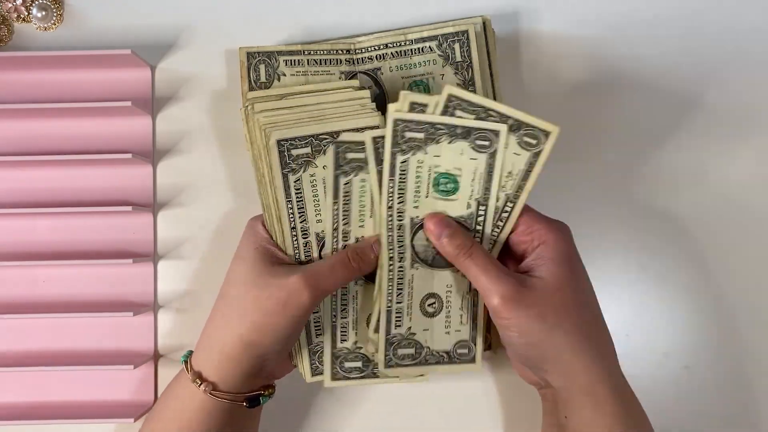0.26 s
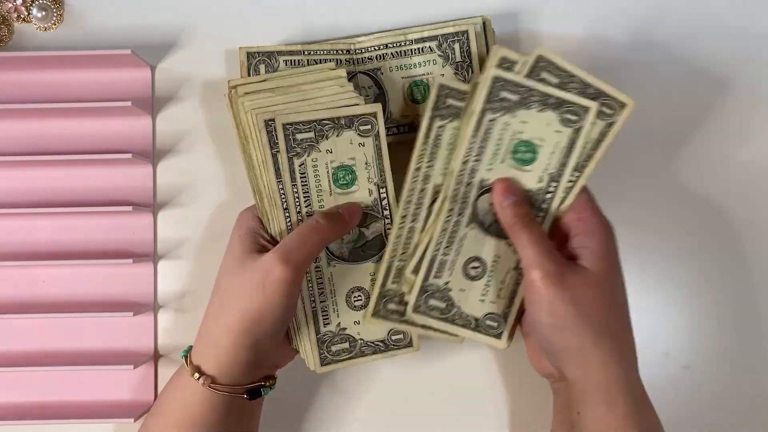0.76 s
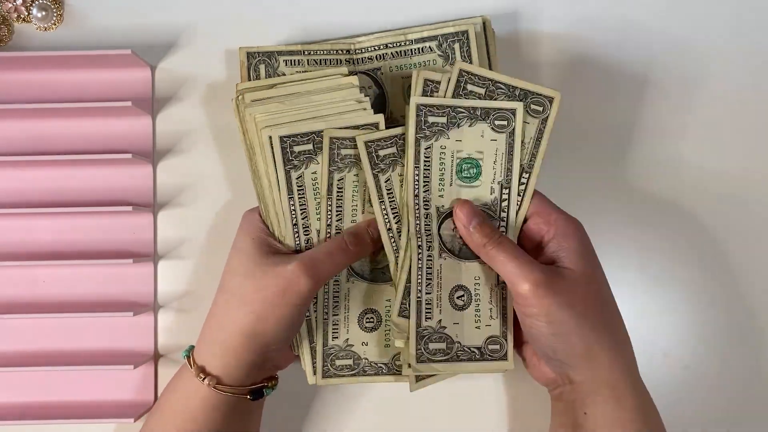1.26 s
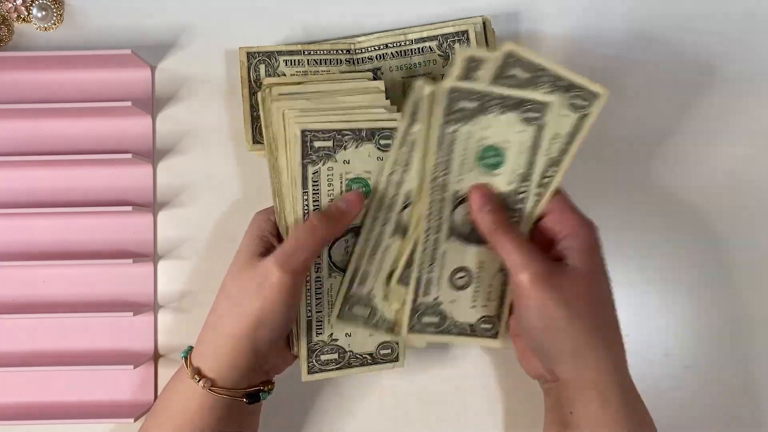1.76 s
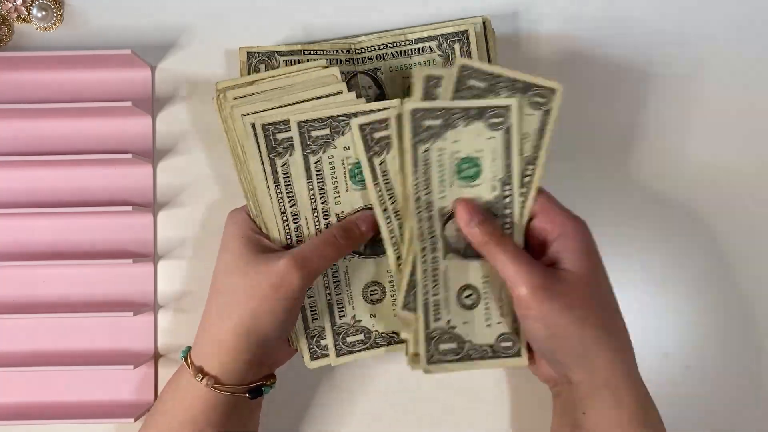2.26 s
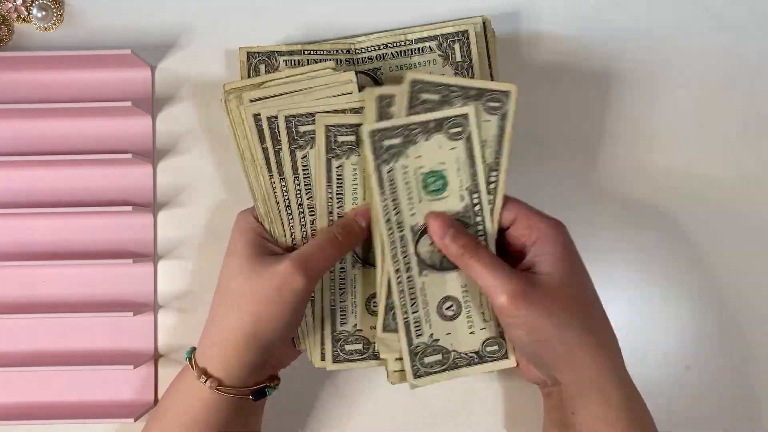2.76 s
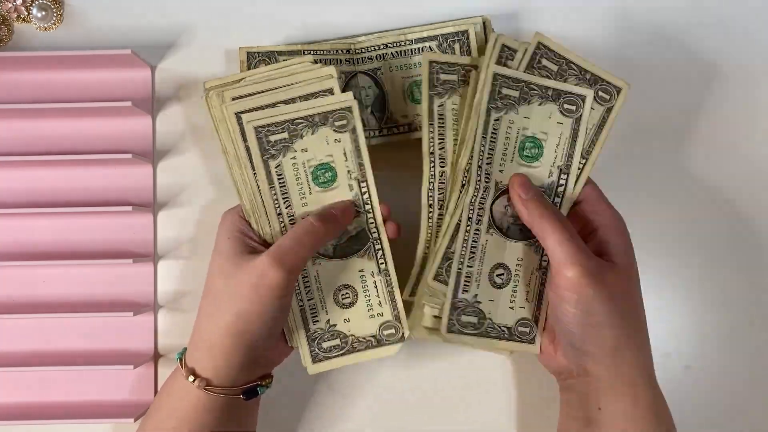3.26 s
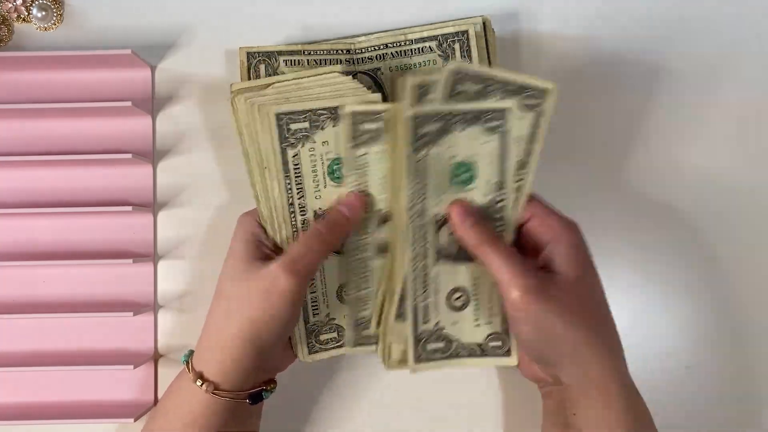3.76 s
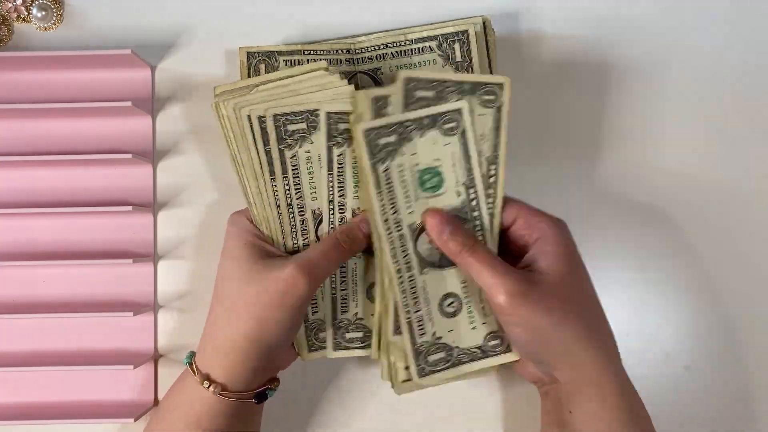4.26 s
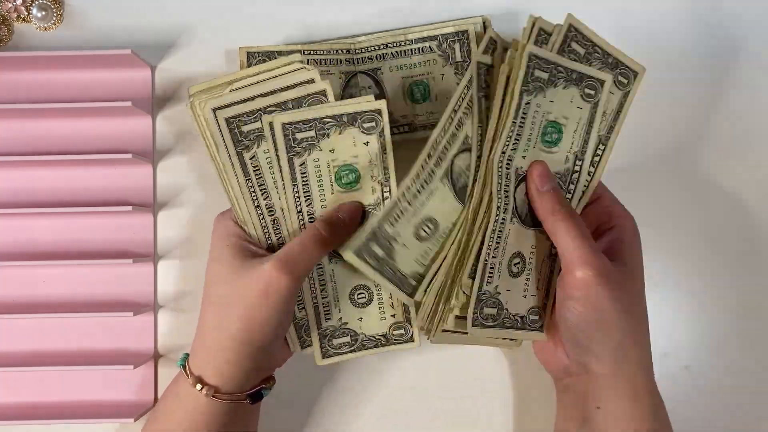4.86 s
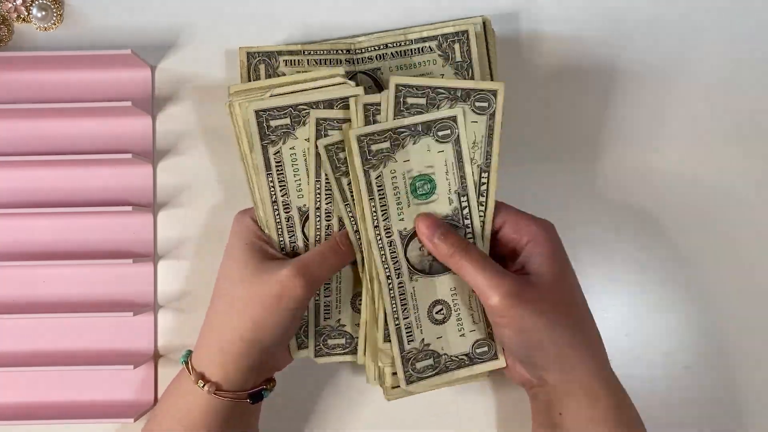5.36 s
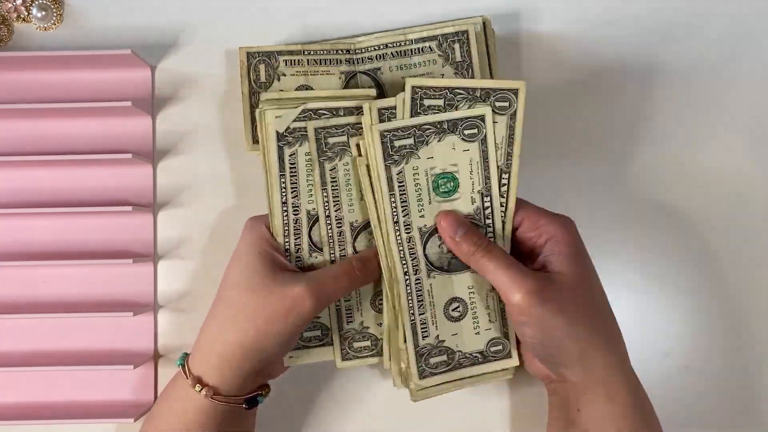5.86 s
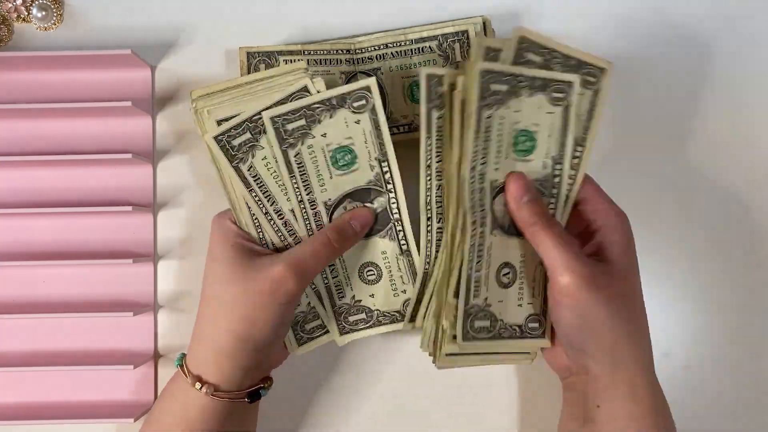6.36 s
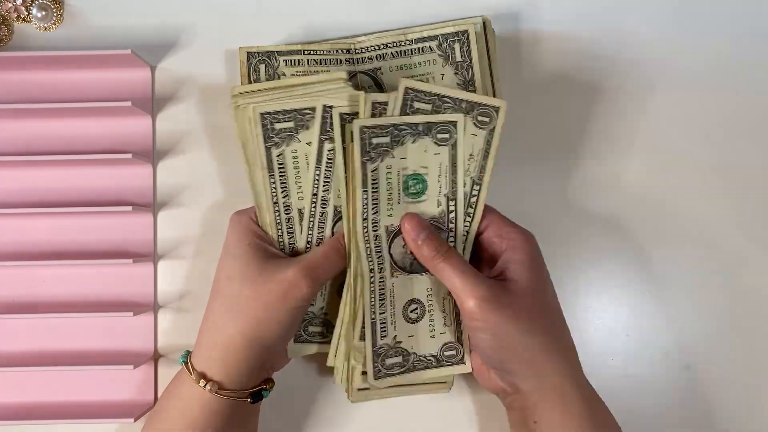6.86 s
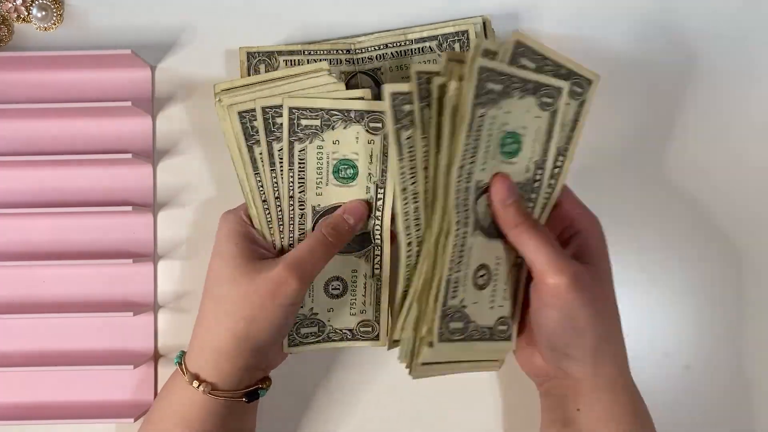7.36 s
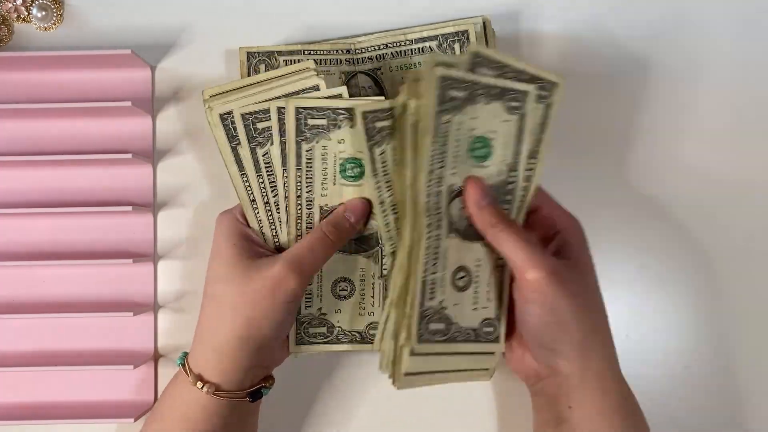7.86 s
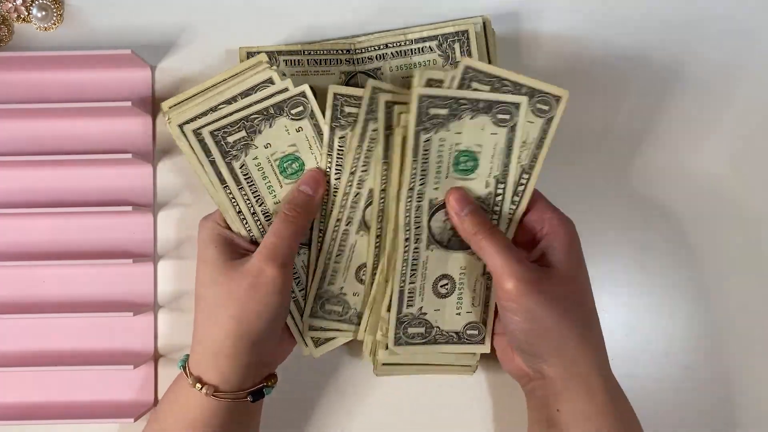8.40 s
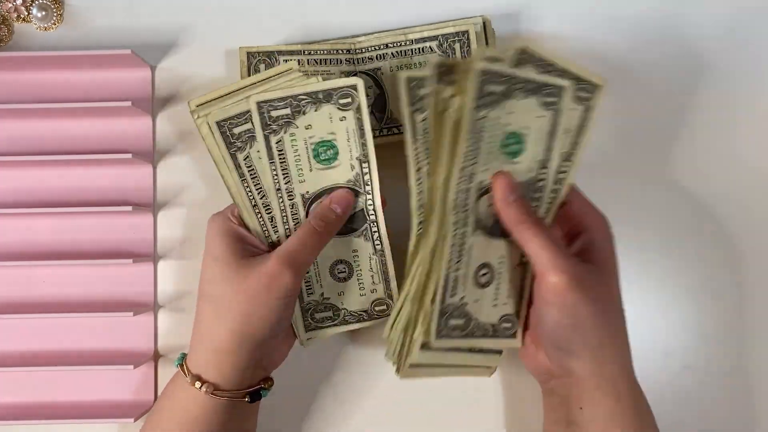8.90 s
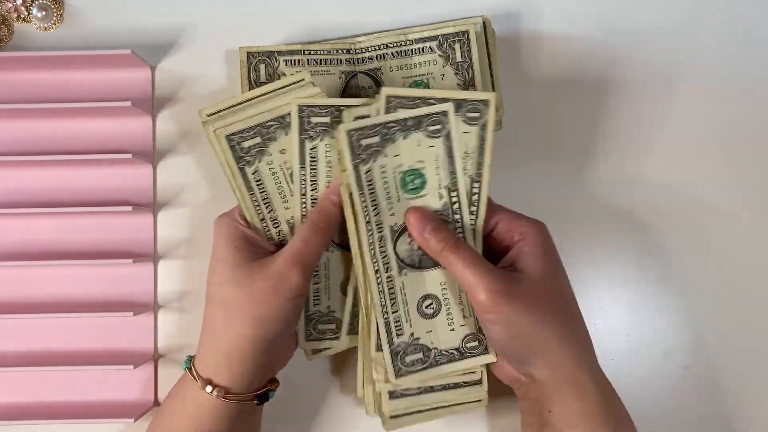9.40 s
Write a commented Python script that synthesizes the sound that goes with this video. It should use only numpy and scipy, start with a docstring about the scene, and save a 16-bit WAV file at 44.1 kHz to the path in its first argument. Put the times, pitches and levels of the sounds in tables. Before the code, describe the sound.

A stack of soft old bills is counted close up, each note sliding with a dry rustle and a small crisp snap in a quiet room.

```python
"""Worn paper banknotes rustle and pop as they are thumbed from one hand to the other above a desk.
Each note slides with a grainy rustle, made of flickering noise, and its creases pop, made of sharp pushes.
Both are coloured by three voices of the paper: the sheets boom in the pocket between the hands,
crack in the mids and hiss in the treble. Behind them a quiet room rumbles as steady noise,
and a low wavering hum, a gliding sine, comes now and then. A phone picks it all up in stereo."""
import sys
import numpy as np
from scipy import signal
from scipy.fft import rfft, irfft, next_fast_len
from scipy.io import wavfile
from scipy.ndimage import uniform_filter1d

SR = 44100
rng = np.random.default_rng(int(sys.argv[2]) if len(sys.argv) > 2 else 0)


def digitize_waveform(pressure):
    """Quantize a signal to 16-bit integers and store it at the path in sys.argv[1].

    Rows of a 2-D input are taken as channels; values are limited to [-1, 1].
    """
    field = np.atleast_2d(pressure).T
    bounded = np.clip(field, -1, 1)
    quanta = np.round(bounded * 32767).astype(np.int16)
    wavfile.write(sys.argv[1], SR, quanta)


N = 424947  # length [samples]

# colour of the air pocket between the hands: (frequency [Hz], relative level [dB])
BOOM = [(90, -39), (250, -13), (500, -11.5), (800, 0), (1100, 0), (1500, -12), (2100, -22), (5000, -51.5)]
# colour of the bent sheet: (frequency [Hz], relative level [dB])
CRACK = [(600, -59.5), (1450, -8), (1900, 3.5), (2800, -1), (3400, -5.5), (3800, -2.5), (4300, -4.5),
         (4700, -1.5), (5600, -8), (7000, -12), (14000, -60.5)]
BEND_LAG_MS = 1.588  # how late a bending wave at 1 kHz arrives; some voices use a share of it


def undb(db):
    """Turn decibels into an amplitude factor."""
    return 10 ** (np.asarray(db) / 20)


def on_log(hz, table):
    """Read a (frequency [Hz], value) table on a log-frequency axis."""
    table_hz, values = np.transpose(table)
    return np.interp(np.log(hz + 1), np.log(table_hz), values)


def response(table, lag_ms=0., size=4096):
    """Short ringing of unit energy with the table's colour; with a lag, low notes come later."""
    hz = np.fft.rfftfreq(size, 1 / SR)
    # folding the cepstrum forward makes the ringing start at once (minimum phase)
    cepstrum = irfft(np.log(undb(on_log(hz, table))))
    cepstrum[1:size // 2] *= 2
    cepstrum[size // 2 + 1:] = 0
    # bending waves run at a speed that grows with the root of frequency
    bend = np.exp(-4j * np.pi * lag_ms * np.sqrt(hz / 1000))
    ringing = irfft(np.exp(rfft(cepstrum)) * bend)
    return ringing / np.sqrt(np.sum(ringing ** 2))


def sound(push, ringing):
    """Let a push signal set off the ringing at every sample."""
    return signal.oaconvolve(push, ringing)[:N]


def walk(rate):
    """Random wander in straight ramps, with `rate` new targets per second; spread about 1.25."""
    hold = int(SR / rate)
    steps = np.repeat(rng.standard_normal(N // hold + 1), hold)
    return 1.53 * uniform_filter1d(steps, hold)[:N]


def room():
    """Steady noise rumble with a faint treble, almost alike in both channels, and a gliding sine hum."""
    # colour of the rumble: (frequency [Hz], relative level [dB])
    rumble_colour = [(15, -29), (25, -8), (54, 0.5), (80, 0), (136, -6), (236, -14.5), (330, -23.5),
                     (480, -27.5), (1200, -46), (2000, -45), (16000, -57.5)]
    # each hum is a list of points: (time [s], pitch [Hz], rms level [dB])
    hum_glides = [
        [(.1, 116.2, -62), (.23, 130, -52), (.4, 137.2, -62), (.55, 111.4, -58)],
        [(1.55, 116, -63), (1.67, 121.7, -56), (1.8, 119, -62)],
        [(3.95, 121.5, -62.5), (4.24, 114.5, -58.5), (4.32, 114, -58)],
    ]
    rumble_db = -57.5  # rms of the noise that both channels share
    t = np.arange(N) / SR
    ringing = response(rumble_colour, size=16384)
    same = sound(rng.standard_normal(N), ringing)
    other = sound(rng.standard_normal(N), ringing)
    rumble = undb(rumble_db) * np.array([same + undb(-14.0) * other, same])
    hum = 0
    for s, hz, db in map(np.transpose, hum_glides):
        gate = np.clip(np.minimum(t - s[0], s[-1] - t) / 0.0086, 0, 1)  # 8.6 ms fades
        turns = np.cumsum(np.interp(t, s, hz)) / SR
        sine = np.sqrt(2) * np.sin(2 * np.pi * turns)  # rms 1
        hum = hum + gate * undb(np.interp(t, s, db)) * sine
    return rumble + hum


def grit(flicker_db, grain_db, rate):
    """Stick-slip of paper fibres: flickering noise with lone larger slips, `rate` per second; rms 1."""
    sizes = undb(grain_db * np.minimum(rng.exponential(size=N), 2.5))
    slips = (rng.random(N) < rate / SR) * sizes
    x = rng.standard_normal(N) * (undb(flicker_db * walk(250)) + 8 * slips)
    return x / np.sqrt(np.mean(x ** 2))


def rubbing():
    """Strength over time of the hiss, crack and boom pushes, from shifting fingers and sliding notes."""
    # the fingers rest and their shifting sinks: (time of the deepest point [s], depth [dB], half length [s])
    pauses = [(1.206, 34, 0.065), (1.579, 16, 0.083), (2.526, 12, 0.032), (2.664, 7, .03),
              (2.827, 12, 0.061), (3.065, 31, 0.061), (4.676, 10.5, 0.19), (5.06, 12, 0.078),
              (5.37, 34, 0.07), (5.733, 6.5, 0.044), (6.097, 6, .04), (6.369, 11, 0.047), (6.587, 7, 0.032),
              (7.114, 10.5, .06), (7.29, 8, .05), (7.63, 9, 0.027), (8.28, 6, 0.22), (8.41, 20, 0.052)]
    # a note dragged over the next: (start [s], length [ms], hiss at the start [dB], boom over hiss [dB])
    drags = [(0.057, 56, -56.5, 5.5), (0.134, 11, -60, -8), (0.174, 44, -61.5, 3.5), (0.268, 6.6, -47, -12),
             (0.373, 38, -65.5, 8), (0.495, 41, -58.5, 4.5), (0.635, 15, -58, 13.5), (0.675, 34, -66, 2.5),
             (0.76, 61, -59.5, 2.5), (0.891, 48, -64.5, 9), (1.015, 49, -71, 6), (1.08, 52, -83, -12),
             (1.284, 15, -57.5, -0.5), (1.404, 46, -57.5, 2), (1.644, 60, -67, 8.5), (1.802, 8, -56, 8.5),
             (1.826, 33, -61, 1), (1.934, 19, -67, 13), (1.979, 39, -61, 7), (2.076, 72, -54.5, 2),
             (2.212, 48, -60, 7.5), (2.322, 54, -64.5, 7), (2.407, 85, -65.5, 9.5), (2.564, 40, -65, 11.5),
             (2.688, 16, -65.5, 1.5), (2.722, 21, -67, -4), (3.006, 19, -59, 6), (3.13, 16, -57, 13),
             (3.15, 51, -73.5, 6), (3.255, 14, -73, 4.5), (3.283, 5.8, -66, 13.5), (3.315, 12, -57, 0.5),
             (3.403, 70, -66.5, 7.5), (3.529, 26, -62.5, 14.5), (3.568, 12, -53, 5.5),
             (3.675, 41, -63.5, 11.5), (3.785, 50, -69.5, 3.5), (3.916, 8.5, -54.5, -2),
             (3.94, 46, -65.5, 13), (4.026, 57, -62, 7), (4.096, 27, -64, 9), (4.191, 53, -69, 19),
             (4.31, 9.1, -59, 9.5), (4.338, 41, -62.5, 9), (4.46, 24.7, -51, 9), (4.62, 23, -75, 2),
             (4.717, 74, -65, 8.5), (4.8, 23, -75, 1), (4.88, 27, -70.5, 5), (4.919, 46, -69.5, 9.5),
             (5.07, 77, -69.5, 11), (5.253, 72.4, -80.5, 8), (5.42, 20, -71, 5), (5.449, 27, -59.5, 5),
             (5.583, 22.3, -47, 8.5), (5.619, 17.5, -46, -9), (5.77, 29.5, -55.5, 10.5),
             (5.818, 12.6, -51.5, 10.5), (5.975, 14.5, -86, 12.5), (6.005, 41, -56, 1.5),
             (6.113, 39, -69, 3), (6.171, 10.6, -42.5, 11.5), (6.2, 10.5, -67.5, 7), (6.411, 27, -73, 5),
             (6.453, 37, -58.5, 11), (6.507, 13.6, -61, 7.5), (6.617, 24, -61, 5.5),
             (6.657, 21, -55.5, 7.5), (6.747, 51, -60.5, 11), (6.814, 22, -43, 0), (6.928, 25, -63.5, 4),
             (6.98, 12, -52, 15.5), (7.027, 18, -54.5, 3.5), (7.166, 12, -60, 3), (7.192, 28, -46, 8),
             (7.33, 34, -72.5, 4.5), (7.378, 74, -69, 2), (7.465, 23, -57, 4.5), (7.534, 8.8, -60, 11),
             (7.563, 22, -60.5, 17), (7.675, 18, -68.5, 7.5), (7.703, 26, -56, 2.5),
             (7.912, 7.6, -73.5, -5), (8.008, 31, -67, 2), (8.139, 8.5, -55.5, 10), (8.342, 38, -70.5, 1.5),
             (8.448, 40, -66.5, 5), (8.576, 31, -60.5, 5.5), (8.625, 32, -63.5, 11.5),
             (8.717, 31, -50.5, 3.5), (8.764, 26, -48.5, 7.5), (8.851, 41, -56, 9.5), (8.898, 29, -55, 10),
             (8.997, 46, -57, 5), (9.164, 53, -56, 8.5), (9.279, 101, -73.5, 10.5), (9.442, 33, -77, 11),
             (9.515, 30, -59, 5), (9.624, 19, -60.5, 10.5)]
    shift_db = -73  # hiss of fingers shifting the stacks, before it wanders and rests
    settle_db, settle_share = -62, 0.82  # a slide drifts this share of the way toward an even hiss
    t = np.arange(N) / SR
    rest_db = sum(db * np.clip(1 - np.abs(t - s) / half, 0, 1) for s, db, half in pauses)
    base = shift_db - rest_db + 1.7 * walk(25)
    power = undb(2 * np.array([base, base - 1.5, base + 0.6 + 4.1 * walk(30)]))
    for start, length, db, boom_db in drags:
        at = slice(max(int((start - .05) * SR), 0), int((start + .2) * SR))
        ms = (t[at] - start) * 1000
        # the note catches abruptly, is drawn along, and lets go a little more slowly
        catch_db = -3.1 * np.maximum(-ms, 0)
        drawn_db = settle_share * (settle_db - db) * np.clip(ms / length, 0, 1)
        let_go_db = -1.25 * np.maximum(ms - length, 0)
        # a boomy slide also cracks more
        crack_db = 0.17 + 0.42 * boom_db
        voices_db = np.array([[0], [crack_db], [boom_db]])
        power[:, at] += undb(2 * (db + catch_db + drawn_db + let_go_db + voices_db))
    return np.sqrt(power)


def pop(ringing, peak_db, chance, spread_ms, scatter):
    """One sharp push and a brief scatter of smaller ones as the crease runs out."""
    burst = scatter * chance * np.exp(-np.arange(len(chance)) / (spread_ms * SR / 1000))
    burst[0] = 1
    x = np.convolve(burst, ringing[:512])
    return x * undb(peak_db) / np.abs(signal.hilbert(x)).max()


def pops(hiss):
    """Creases buckle and edges slap: each has its own size, so its own boom pitch and crack colour."""
    # (time [s], boom peak [dB], boom pitch [Hz], crack peak [dB], hiss peak [dB])
    creases = [(0.0706, -30.5, 1170, -37, -60), (0.2736, -61, 1050, -38.5, -46),
               (0.5078, -38, 905, -41, -58), (0.6406, -47, 910, -34.5, -61), (0.937, -43, 930, -46, -54),
               (1.44, -36, 1150, -36.5, -54), (1.8287, -34, 1000, -29, -41), (2.1242, -30, 990, -34.5, -52),
               (2.2452, -36, 1130, -41, -26), (2.4551, -30.5, 800, -38.5, -57),
               (2.4714, -31.5, 1130, -31.5, -47), (2.987, -44.5, 1240, -38, -38.5),
               (3.1302, -26, 905, -44, -50), (3.1436, -33.5, 850, -57, -56), (3.5488, -26, 1030, -36, -59),
               (3.5701, -28, 900, -58, -62), (3.6785, -30.5, 900, -56, -63), (3.7036, -26, 870, -37, -65),
               (3.835, -36.5, 885, -64, -58), (3.9428, -32, 980, -30.5, -56), (3.962, -24.5, 870, -46, -58),
               (4.0742, -35, 990, -51, -60), (4.2133, -24.5, 1170, -31.5, -46),
               (4.2361, -24, 805, -28, -34), (4.339, -26, 940, -30.5, -69),
               (4.4658, -25.5, 910, -23.5, -28), (4.4748, -30.5, 1010, -55, -54),
               (4.7143, -38, 774, -36.5, -72), (4.7769, -33, 910, -33.5, -31), (4.935, -43, 950, -48, -60),
               (4.963, -41, 950, -47, -58), (5.134, -43, 800, -55, -66), (5.451, -19.5, 1080, -28.5, -68),
               (5.4624, -29.5, 1120, -32, -58), (5.467, -35, 1060, -34.5, -42),
               (5.587, -16.5, 950, -21.5, -23), (5.6218, -43, 1350, -30, -20.5),
               (5.7793, -44, 720, -31, -50), (5.7842, -42, 1010, -28.5, -52), (5.789, -34, 930, -40, -59),
               (5.818, -24.5, 965, -50, -55), (6.1719, -19.5, 920, -21.5, -27),
               (6.4586, -35.5, 980, -51, -61), (6.7747, -36.5, 990, -33, -49), (6.779, -44, 880, -27, -62),
               (6.7934, -34.5, 1030, -31.5, -54), (6.817, -28.5, 1030, -15.5, -16),
               (6.9839, -20, 904, -37.5, -40), (6.9887, -32, 1070, -46, -42),
               (7.169, -33.5, 700, -35.5, -68), (7.193, -25, 1050, -28.5, -53),
               (7.2037, -36, 920, -31.5, -35.5), (7.3804, -28.5, 1140, -37, -76),
               (7.5648, -22.5, 980, -27.5, -58), (7.578, -27.5, 1020, -39, -49),
               (7.6932, -36, 890, -55, -63), (8.145, -31, 830, -56, -36.5), (8.6523, -35, 1010, -42, -53),
               (8.7399, -36.5, 820, -50, -50), (8.7712, -27.5, 1220, -22.5, -25.5),
               (8.856, -24.5, 880, -47, -50.5), (8.8735, -28, 900, -30, -33.5),
               (8.8808, -27, 1000, -44, -63), (8.9025, -25.5, 930, -38, -51), (8.9077, -27, 950, -32, -53),
               (9.016, -35, 870, -56, -55), (9.1655, -24, 1030, -28, -59),
               (9.5157, -25.5, 1070, -33.5, -65), (9.53, -34, 990, -42, -42)]
    out = np.zeros(N + SR)
    hz = np.geomspace(300, 16000, 40)
    chances = rng.standard_normal((len(creases), 3, 256))
    for (s, boom_db, boom_hz, crack_db, hiss_db), chance in zip(creases, chances):
        # the whole boom colour shifts with the pitch
        boom = response(np.array(BOOM) * [boom_hz / 950, 1], BEND_LAG_MS, size=1024)
        # a hissier pop cracks higher: 0.04 octaves for each dB of hiss over crack
        crack_hz = 3830 * 2 ** (0.04 * (hiss_db - crack_db))
        colour_db = on_log(hz, CRACK) - 14 * np.tanh(np.log(hz / crack_hz) ** 2 / 0.75)
        crack = response(np.transpose([hz, colour_db]), 0.604 * BEND_LAG_MS, size=1024)
        x = pop(boom, boom_db, chance[0], 3.2, 0.077)
        x = x + pop(crack, crack_db, chance[1], 1.0, 0.2)
        x = x + pop(hiss, hiss_db, chance[2], 0.93, 0.088)
        first = int(s * SR)
        out[first:first + len(x)] += x
    return out[:N]


def banknotes():
    """Rubbing and pops drive the boom, crack and hiss of the paper."""
    # colour of the treble: (frequency [Hz], relative level [dB])
    hiss_colour = [(3000, -35), (5500, -2.5), (6500, -6), (10000, -3.5), (16000, -10)]
    boom = response(BOOM, BEND_LAG_MS)
    hiss = response(hiss_colour, 0.414 * BEND_LAG_MS)
    hiss_rub, crack_rub, boom_rub = rubbing()
    rub = sound(hiss_rub * grit(2.64, .4, 23), hiss)
    rub = rub + sound(boom_rub * grit(2.86, 2.37, 60), boom)
    # the bent sheet favours now the low, now the high part of its crack
    for centre_hz in (2100, 3300, 4900):
        part = [(hz, db - 16 * np.tanh(np.log(hz / centre_hz) ** 2 / 0.52)) for hz, db in CRACK]
        favour = undb(1.75 * walk(40) - 6.0)
        push = crack_rub * favour * grit(3.4, 0.57, 120)
        rub = rub + sound(push, response(part, BEND_LAG_MS))
    return rub + pops(hiss)


def scene():
    """The same banknotes in both channels, over the room."""
    return banknotes() + room()


def record(dry):
    """The phone turns the phase and level of its left channel and cuts the top of both."""
    # left channel against right: (frequency [Hz], phase ahead [rad])
    left_phase = [(0, 0), (300, -.1), (500, .4), (900, .3), (1600, .05), (2700, .75), (4000, .55),
                  (4900, 0), (6000, 1.6), (7330, 3.14), (8600, 4.4), (10500, 6.28), (13400, 9.42),
                  (15800, 11.8)]
    # left channel against right: (frequency [Hz], level [dB])
    left_db = [(30, -1.3), (120, -2.5), (300, -7), (700, -3.3), (1600, -.9), (2700, -3.5), (3500, -2),
               (4400, -4.5), (5300, -.8), (16000, -1.1)]
    top_hz = 15750
    size = next_fast_len(N)
    hz = np.fft.rfftfreq(size, 1 / SR)
    phase = np.interp(hz, *np.transpose(left_phase))
    spectrum = rfft(dry[0], size) * undb(on_log(hz, left_db)) * np.exp(1j * phase)
    # the turn sways as the hands move, least where the channels are exactly in step or opposed
    sway = 0.73 * walk(60)
    turned = irfft(1j * np.sin(phase) * spectrum, size)[:N]
    left = irfft(spectrum, size)[:N] + sway * turned
    top_cut = signal.ellip(10, .2, 60, top_hz, fs=SR, output="sos")
    return signal.sosfilt(top_cut, [left, dry[1]])


dry = scene()
out = record(dry)
digitize_waveform(out)
```